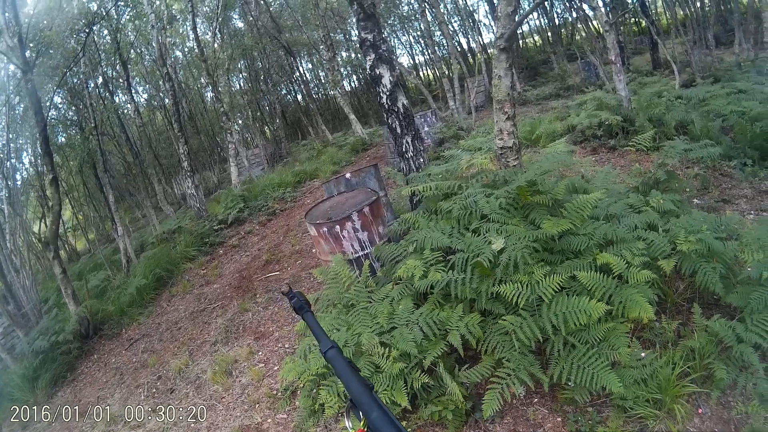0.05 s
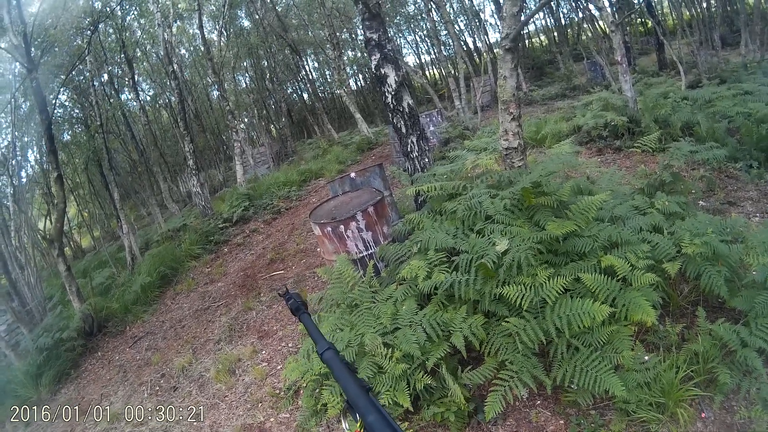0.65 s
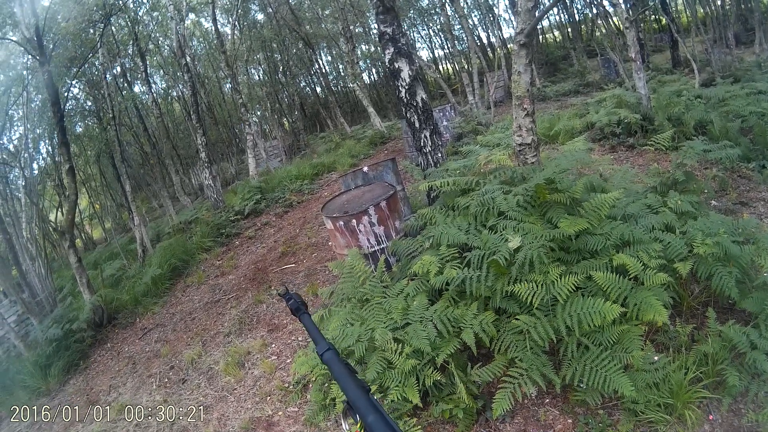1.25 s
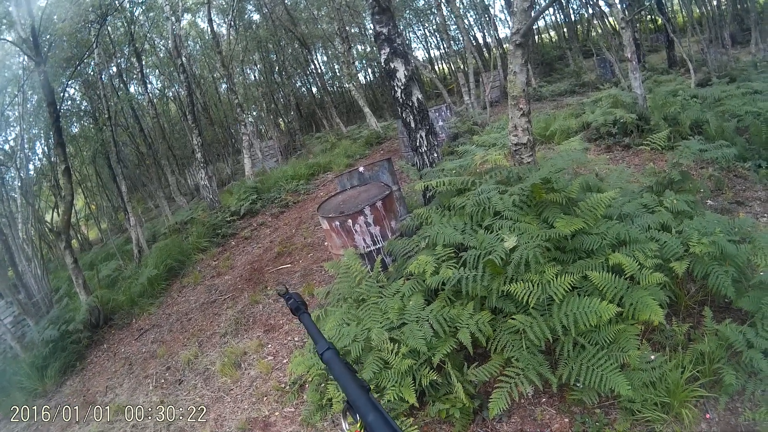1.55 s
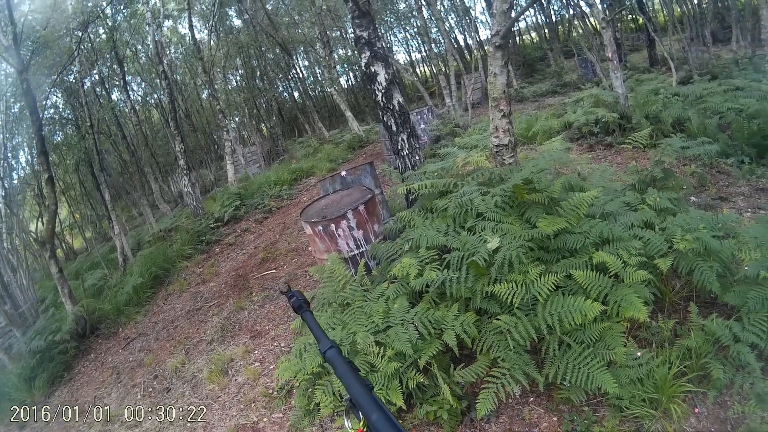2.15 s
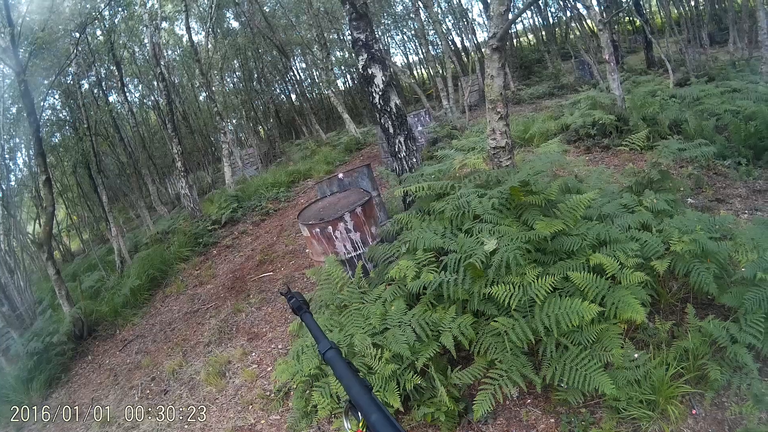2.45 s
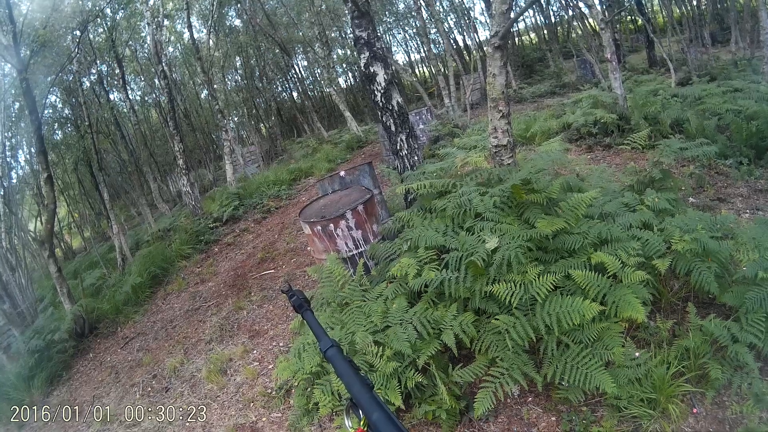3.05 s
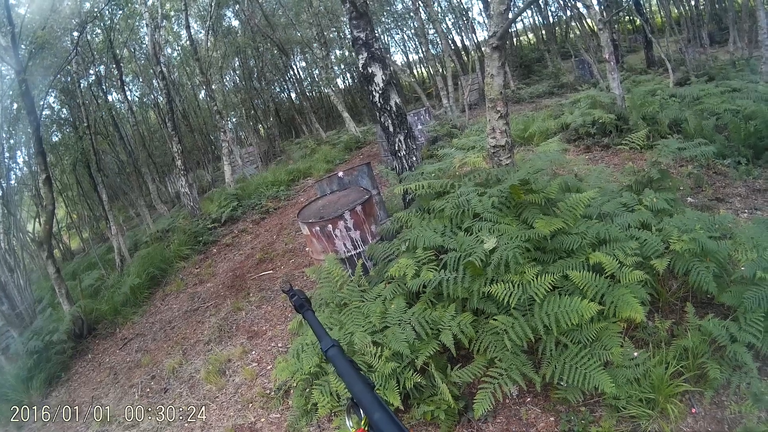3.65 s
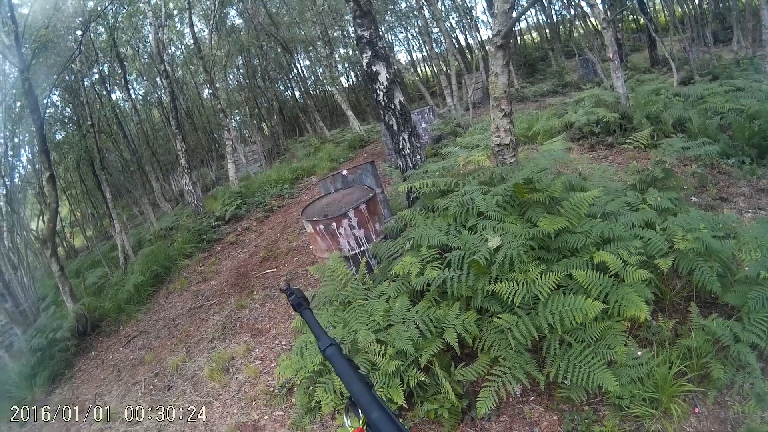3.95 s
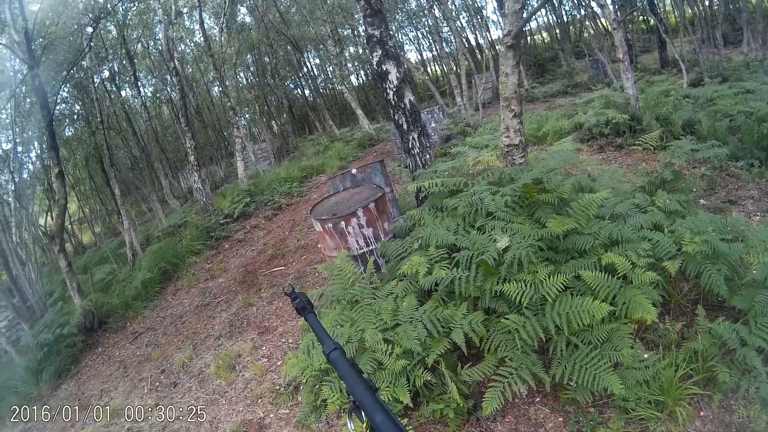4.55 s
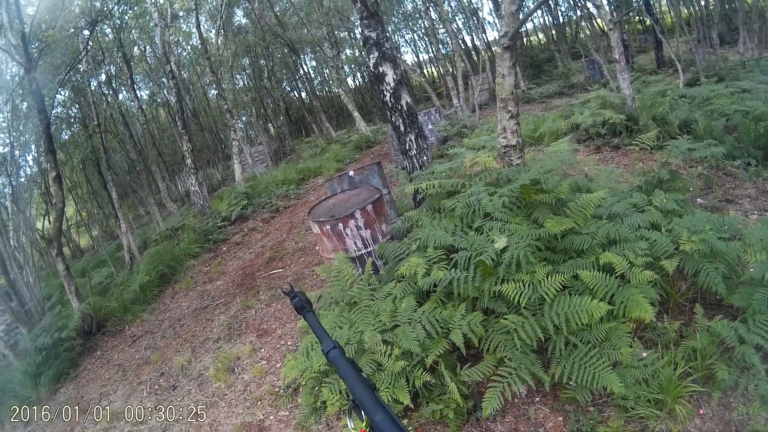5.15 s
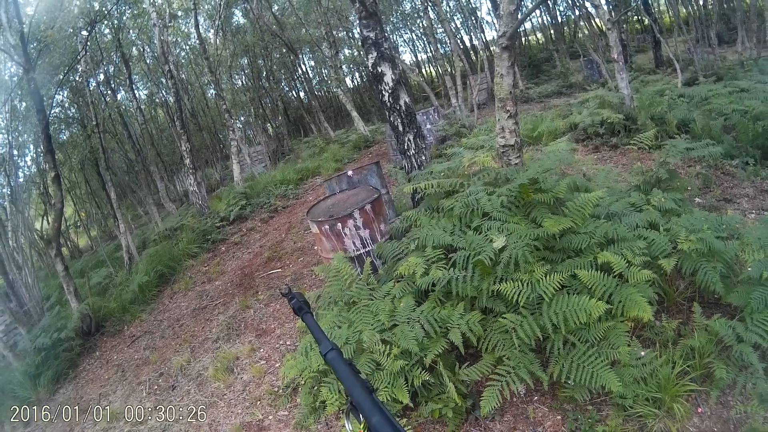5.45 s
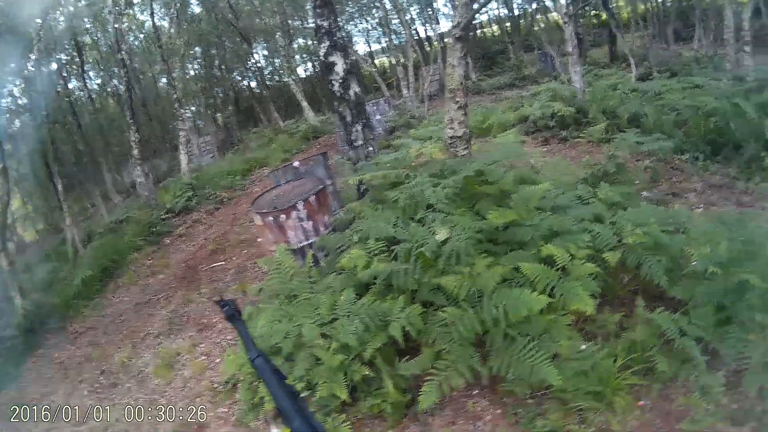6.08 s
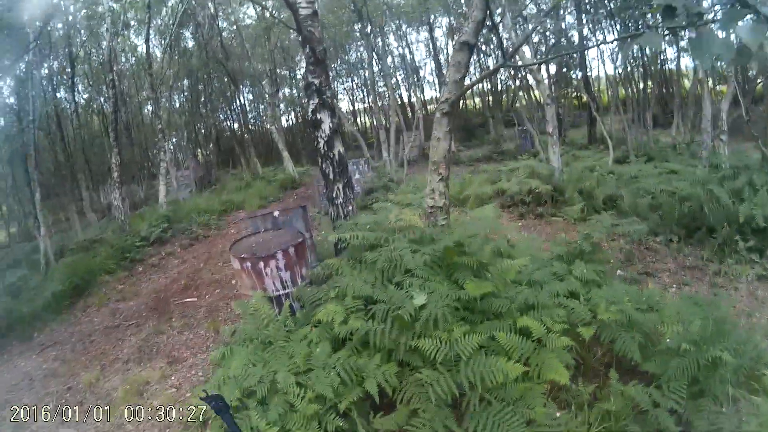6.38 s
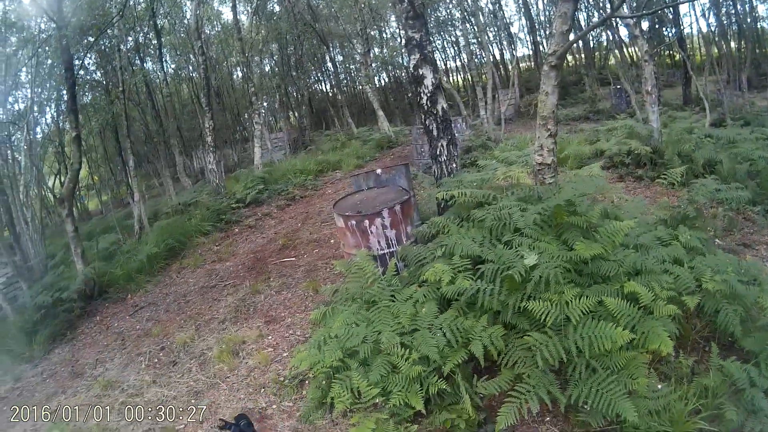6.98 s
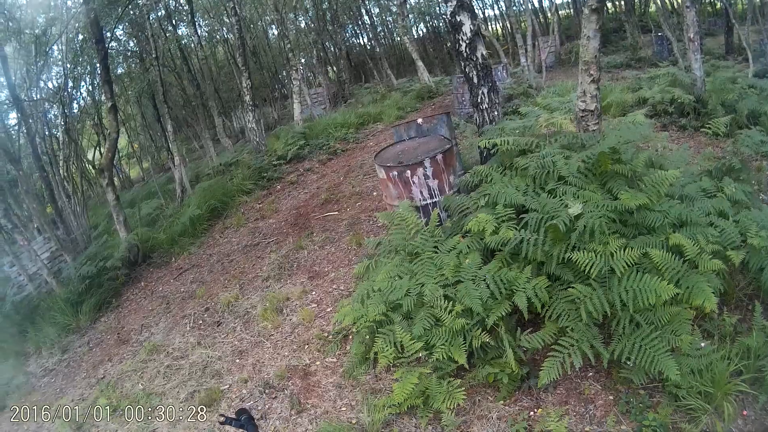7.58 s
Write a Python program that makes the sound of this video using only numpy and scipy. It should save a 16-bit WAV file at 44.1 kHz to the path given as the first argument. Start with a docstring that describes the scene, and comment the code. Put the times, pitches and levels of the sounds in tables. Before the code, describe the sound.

In still woodland, an arm's length from the microphone, an electric airsoft gun rattles through four rapid bursts. Its motor whines and its piston clacks about fourteen times a second, winding down briefly between bursts. Then comes one loud, sharp knock right at the microphone, a few soft handling thumps and a light dry click, leaving only a faint outdoor hiss.

```python
"""In still woodland, an electric airsoft machine gun fires four bursts an arm's length from a head camera.
In each cycle whining gears draw the piston back against its spring and let it go; it rattles forward
and slams home, ringing the barrel and receiver. The trees scatter back a faint tail.
After the last burst a hard knock close to the microphone overloads it, and a lighter click follows.
Soft handling bumps and a quiet bed of air sit underneath."""
import sys
import numpy as np
from scipy import signal
from scipy.fft import rfft, irfft, next_fast_len
from scipy.io import wavfile

SR = 44100
rng = np.random.default_rng(int(sys.argv[2]) if len(sys.argv) > 2 else 0)


def file_out(sig):
    """Save sig as 16-bit WAV at sys.argv[1]."""
    # one column per channel
    cols = np.atleast_2d(sig).T
    # limit, then scale
    lim = np.clip(cols, -1, 1)
    pcm = np.round(lim * 32767).astype(np.int16)
    wavfile.write(sys.argv[1], SR, pcm)


N = 344857
T = np.arange(N) / SR

# Colour of the woodland air. Each row: frequency in Hz, relative level in dB.
AIR_COLOUR = [(20, -6), (50, -16), (100, -13), (200, -14), (400, -18), (800, -26.5), (1300, -30.5),
              (1850, -25.5), (2300, -34), (2850, -31), (4000, -37.5), (8000, -39), (14500, -38.5),
              (16000, -47.5)]
# The camera's thin electronic whistle. Each row: pitch in Hz, rms level in dB.
WHISTLE_TONES = [(6804, -76), (13609, -91)]
# Soft handling thumps. Each row: start in seconds, level in dB, pitch in Hz, t60 in seconds.
HANDLING_BUMPS = [(0.167, -41, 89, 0.075), (5.385, -43, 82, 0.2), (5.946, -29, 160, 0.07),
                  (5.96, -44.5, 81, 0.16), (6.367, -44.5, 44, 0.1), (6.519, -49.5, 85, 0.13),
                  (6.721, -37.5, 132.4, 0.035), (6.766, -44, 73.7, 0.23)]

# Rings of the hollow click, the hard knock, and the barrel and receiver under the slam.
# Each row: pitch in Hz, level in dB before any filtering, t60 in seconds.
CLICK_MODES = [(410, -42, 0.045), (1093, -37.5, .04), (2900, -35, 0.032)]
KNOCK_MODES = [(420, -13.5, .035), (740, -43, .06), (1430, -11.5, 0.045), (1710, 3.5, 0.02),
               (1954, -35.5, 0.076), (2140, 8, .014), (2700, 12.5, 0.01), (2950, 10.5, .01),
               (3960, 5, 0.012), (3950, -32, .12), (5870, -37, 0.056), (6490, -42, .06),
               (7230, -56.5, 0.16)]
BODY_MODES = [(392.2, -28.5, 0.025), (560, -36, 0.035), (683, -39.5, .03), (745, -26, 0.023),
              (964.5, -24, 0.037), (1170, -16, 0.031), (1230, -18.5, 0.043), (1450, -31.5, 0.062),
              (1743, -25, 0.04), (2007, -18, 0.023), (2748, -25, 0.053), (3004, -32, 0.026)]

# Resonances of the latch pawl, the gearbox shell, steel on steel, and the piston's rails.
# Each row: centre in Hz, width in Hz, relative level in dB.
PAWL_PEAKS = [(1030, 250, -6), (1910, 220, 5), (2600, 220, -1), (3140, 220, -3), (3850, 250, -8.5),
              (5840, 970, -17), (8000, 1300, -27.5)]
SHELL_PEAKS = [(540, 85, -5), (741, 23, 7), (832, 41, -2), (925, 65, -3.5), (1100, 110, -6), (1233, 70, 2),
               (1797, 45, -4.5), (1982, 110, 13), (2698, 130, 10), (3147, 230, 7.5), (3773, 170, 3),
               (4743, 280, -6), (5720, 550, -4.5), (7376, 700, -15.5), (8650, 900, -21), (10610, 1100, -13),
               (12200, 900, -18)]
STEEL_PEAKS = [(4050, 450, 2.5), (4643, 300, 8), (5430, 240, 1.5), (6663, 410, -13.5), (10310, 400, -8),
               (11040, 300, -10.5), (12240, 300, -18)]
RAIL_PEAKS = [(895, 270, -7), (1673, 50, -6), (1924, 270, 11), (2570, 52, 3.5), (3052, 59, 13),
              (3880, 330, -6.5)]

# Trigger pulls. Each row: motor on, motor off, gears at rest and first slam, all in seconds,
# number of shots, cycle length in seconds, seconds lost while the motor gains speed.
TRIGGER_PULLS = [(-.2, 1.24, 1.32, .0431, 17, .07216, 0), (1.526, 2.625, 2.71, 1.5665, 15, .07238, .0205),
                 (2.892, 3.95, 4.05, 2.9735, 14, .0725, .012),
                 (4.245, 5.67, 5.785, 4.3031, 20, .07249, .0168)]
# The half-drawn spring throws the gears back on their latch.
# Each row: start in seconds, relative level in dB.
LATCH_CLACKS = [(1.29, -31.5), (2.71, -33), (4.027, -28.5)]
# Gear mesh over one cycle, sagging as the spring is drawn. Each row: position in the cycle from 0 to 1,
# pitch at full speed in Hz, overall gear gain in dB, extra squeal gain in dB.
GEAR_CYCLE = [(0, 2413, 3, -29), (0.2, 2792, -5.5, -16), (0.359, 2761, -3, -13.5), (.54, 2593, -5.5, -9.5),
              (.63, 2500, -5, 2.5), (0.76, 2357, -5, 0), (0.861, 2221, -9, -18), (1, 2381, -8, -24)]

# Steel ticks and rail contacts as the piston runs forward, then rebounds.
# Each row: offset from the slam in seconds, relative level in dB.
RACK_TICKS = [(-.0026, -16.5), (-.0013, -9), (.0025, -20.5), (.0061, -21), (.0071, -24)]
RAIL_CONTACTS = [(-.0054, -5), (-.0039, 1.5), (-.0023, 2.5), (.0018, 0.5), (.0054, -1), (.0069, 0)]


def undb(db):
    """Decibels to gain."""
    return 10 ** (np.asarray(db) / 20)


def unit(x):
    """Scale to rms 1."""
    return x / np.std(x)


def span(seconds):
    """Time axis of a short sound."""
    return np.arange(int(seconds * SR)) / SR


def fade(t, t60):
    """Exponential decay, 60 dB down after t60 seconds."""
    return np.exp(-np.log(1000) * t / t60)


def add(out, at, sound):
    """Mix a sound in at a time in seconds."""
    i = max(int(at * SR), 0)
    out[i:i + len(sound)] += sound[:max(N - i, 0)]


def band(x, low_hz, high_hz):
    """Band-pass EQ."""
    sos = signal.butter(3, [low_hz, min(high_hz, .45 * SR)], "band", fs=SR, output="sos")
    return signal.sosfilt(sos, x)


def through(x, response):
    """Play a sound through an impulse response."""
    return signal.oaconvolve(x, response)[:N]


def strikes(times, sizes):
    """A train of one-sample clicks."""
    return np.bincount(np.clip(np.round(times * SR).astype(int), 0, N - 1), sizes, N)


def scuff(times, sizes, t60):
    """Decaying puffs of friction noise, each gated off after 60 ms."""
    return through(strikes(times, sizes), fade(span(.06), t60)) * rng.standard_normal(N)


def ring(modes, t):
    """Free ring of (Hz, dB, t60) modes."""
    return sum(undb(db) * fade(t, t60) * np.sin(2 * np.pi * hz * t) for hz, db, t60 in modes)


def resonator(peaks, low_hz, high_hz):
    """Unit-energy response of (Hz, width, dB) resonances of a part too small to radiate bass."""
    t = np.arange(2048) / SR
    response = sum(undb(db) * width * np.exp(-np.pi * width * t) * np.sin(2 * np.pi * hz * t)
                   for hz, width, db in peaks)
    response = band(response, low_hz, high_hz)
    return response / np.linalg.norm(response)


def noise(colour, size):
    """Noise of rms 1 with a (Hz, dB) colour."""
    hz, db = np.transpose(colour)
    n = next_fast_len(size, True)
    bin_hz = np.maximum(np.fft.rfftfreq(n, 1 / SR), 1)
    eq = undb(np.interp(np.log(bin_hz), np.log(hz), db))
    return unit(irfft(rfft(rng.standard_normal(n)) * eq, n)[:size])


def walk(rate_hz):
    """A gliding random modulator with a spread near 1."""
    knots = rng.standard_normal(int(N / SR * rate_hz) + 2)
    return np.interp(T * rate_hz, np.arange(len(knots)), knots)


def air(level_db=-61, swell_db=.7):
    """The bed: a quiet rumble and hiss that swells a little."""
    return noise(AIR_COLOUR, N) * undb(level_db + swell_db * walk(6.2))


def woodland(source, wet_db=-28, t60=1.0, build_s=.011):
    """Trunks scatter back a faint tail, scooped in the mids."""
    t = span(.6)
    colour = [(150, 11.5), (500, -2.5), (1200, -9.5), (3000, -12.5), (7000, 4), (15000, -8)]
    tail = noise(colour, len(t)) * fade(t, t60) * (1 - np.exp(-t / build_s))
    return undb(wet_db) * through(source, tail / np.linalg.norm(tail))


def bumps(attack_s=.0016):
    """Soft low thumps as the gun and camera are moved."""
    out, t = np.zeros(N), span(.3)
    for at, db, hz, t60 in HANDLING_BUMPS:
        add(out, at, ring([(hz, db, t60)], t) * (1 - np.exp(-t / attack_s)))
    return out


def click(start_s=6.7643, snap_db=-33, tail_db=-60):
    """A light, dry handling click: a snap, a hollow ring and a faint tail."""
    out, t = np.zeros(N), span(.4)
    colour = [(200, -8), (750, -13), (1100, 1), (1500, -6), (2000, 2),
              (3000, -2.5), (5500, -7), (9000, -12), (14000, -2), (16000, -23)]
    envelope = undb(snap_db) * fade(t, t60=.045) + undb(tail_db) * fade(t, t60=.57)
    add(out, start_s, noise(colour, len(t)) * envelope + ring(CLICK_MODES, t))
    return out


def knock(start_s=5.946, crack_db=1.5):
    """A hard knock right by the microphone: a crack and a short ring."""
    out, t = np.zeros(N), span(.3)
    colour = [(200, -29.5), (1000, -14), (1800, 2), (3200, 1.5), (5000, .5), (9000, -13), (16000, -16)]
    crack = undb(crack_db) * noise(colour, len(t)) * fade(t, t60=.014)
    add(out, start_s, band(crack + ring(KNOCK_MODES, t), low_hz=240, high_hz=14000))
    return out


def recoil(slams, sizes, gain_db=-40):
    """Each shot shakes the camera with a faint low thud."""
    return undb(gain_db) * band(scuff(slams, sizes, t60=.39), low_hz=62, high_hz=200)


def latch(take_up_db=-46, bounce_s=.021, bounce_db=-9):
    """Small steel clacks: the gears take up slack, or fall back on their latch with one bounce."""
    starts = np.array([on for on, *_ in TRIGGER_PULLS if on > 0])
    falls, fall_db = np.transpose(LATCH_CLACKS)
    times = np.r_[starts, falls, falls + bounce_s]
    levels = np.r_[np.full(len(starts), take_up_db), fall_db, fall_db + bounce_db]
    clacks = scuff(times, undb(levels), t60=.052)
    return through(clacks, resonator(PAWL_PEAKS, low_hz=700, high_hz=11040))


def motor_speed(spin_up_s=.041):
    """Speed from 0 to 1: the motor winds up on each trigger pull, then coasts to rest."""
    speed = np.zeros(N)
    for on, off, rest, *_ in TRIGGER_PULLS:
        wind_up = 1 - np.exp(-np.maximum(T - on, 0) / spin_up_s)
        speed += wind_up * np.clip((rest - T) / (rest - off), 0, 1)
    return speed


def cycle_position(slams):
    """A ramp from 0 to 1 from slam to slam, held at 1 in the pauses."""
    period = np.median(np.diff(slams))
    marks = np.r_[slams[0] - period, slams, slams[-1] + period]
    lengths = np.minimum(np.diff(marks), 1.25 * period)
    latest = np.clip(np.searchsorted(marks, T, "right") - 1, 0, len(slams))
    return np.clip((T - marks[latest]) / lengths[latest], 0, 1)


def gears(slams, whine_db=-45, spur_db=-52, squeal_db=-36, grind_db=-31.5, waver_db=.9):
    """The pinion whines and the teeth grind, both ringing the shell; the pitch sags in every cycle."""
    speed, position = motor_speed(), cycle_position(slams)
    points, *curves = np.transpose(GEAR_CYCLE)
    mesh_hz, load_db, strain_db = (np.interp(position, points, curve) for curve in curves)
    wobble = 1 + .018 * walk(900) + .012 * walk(30)
    phase = 2 * np.pi * np.cumsum(mesh_hz * np.sqrt(speed) * wobble) / SR
    whine = undb(whine_db) * np.sin(phase)
    spur = undb(spur_db) * np.sin(phase / 3)
    # with the spring nearly full, the strained teeth squeal on their overtones
    overtones = np.sin(2 * phase) + undb(-10) * np.sin(3 * phase) + undb(-12) * np.sin(4 * phase)
    squeal = undb(squeal_db + strain_db) * overtones
    # the tones drop out first as the gears coast, leaving the rattle
    tones = (whine + spur + squeal) * undb(waver_db * walk(50)) * speed ** 3
    # uneven teeth grind harder once per turn of the pinion
    grit = rng.standard_normal(N) * undb(1.2 * walk(700))
    grind = undb(grind_db) * unit(grit * (1 + .5 * np.sin(phase / 10)))
    drive = (tones + grind) * undb(load_db) * speed ** 1.5
    return through(drive, resonator(SHELL_PEAKS, low_hz=670, high_hz=10170))


def release(slams, sizes, slip_lead_s=.0145, slip_db=-34, spring_lead_s=.014, spring_db=-28.5):
    """Just before each slam the last tooth slips off the piston and the freed spring rasps."""
    slip = scuff(slams - slip_lead_s, sizes, t60=.055)
    rasp = scuff(slams - spring_lead_s, sizes, t60=.05)
    tooth = through(slip, resonator([(1280, 190, 0)], low_hz=700, high_hz=2500))
    spring = through(rasp, resonator([(1960, 170, 0)], low_hz=1300, high_hz=3200))
    return undb(slip_db) * tooth + undb(spring_db) * spring


def steel_rack(slams, sizes, loading_s=.011, loading_db=-36, grit_db=-18, jitter_s=.00008):
    """The bright edge: the piston's rack ticks out and back, then the tappet and nozzle rasp as the next BB
    loads."""
    offsets, tick_db = np.transpose(RACK_TICKS)
    jitter = jitter_s * rng.standard_normal((len(slams), len(offsets)))
    times = (slams[:, None] + offsets + jitter).ravel()
    gains = (sizes[:, None] * undb(tick_db)).ravel()
    ticks = strikes(times, gains) + undb(grit_db) * scuff(times, gains, t60=.0042)
    loading = undb(loading_db) * scuff(slams + loading_s, sizes, t60=.045)
    return through(ticks + loading, resonator(STEEL_PEAKS, low_hz=3490, high_hz=10000))


def piston(slams, sizes, slam_db=.5, rattle_db=-5, scrape_db=-24, jitter_s=.00002, scatter_db=.7):
    """The punch: the piston chatters along its rails, slams into the cylinder head and rebounds."""
    # the rubber piston head softens the blow
    body = band(ring(BODY_MODES, span(.1)), low_hz=499, high_hz=3185)
    slam = through(strikes(slams, sizes * undb(slam_db)), body)
    offsets, contact_db = np.transpose(RAIL_CONTACTS)
    chance = rng.standard_normal((len(slams), 2, len(offsets)))
    times = (slams[:, None] + offsets + jitter_s * chance[:, 0]).ravel()
    gains = (sizes[:, None] * undb(contact_db + scatter_db * chance[:, 1])).ravel()
    contacts = strikes(times, gains) + undb(scrape_db) * scuff(times, gains, t60=.0076)
    rattle = through(contacts, resonator(RAIL_PEAKS, low_hz=1100, high_hz=4050))
    return slam + undb(rattle_db) * rattle


def firing_rhythm(settle=.14, coast_drag=.63, slow_start_db_per_s=-220, scatter_db=.64):
    """Times and strengths of the slams: a steady cycle, slower while the motor gains speed or coasts."""
    times, levels = [], []
    for _, off, _, first, count, cycle, lost in TRIGGER_PULLS:
        shot = np.arange(count)
        at = first + shot * cycle + lost * (1 - settle ** shot)
        times.append(at + coast_drag * np.maximum(at - off, 0))
        levels.append(slow_start_db_per_s * lost * (shot == 0))  # a slow start softens the first shot
    db = np.concatenate(levels)
    return np.concatenate(times), undb(db + scatter_db * rng.standard_normal(len(db)))


def scene():
    """The mono mix: the gun, the knock and the handling among the trees."""
    slams, sizes = firing_rhythm()
    gun = gears(slams) + release(slams, sizes) + piston(slams, sizes)
    gun += steel_rack(slams, sizes) + latch()
    return (gun + woodland(gun) + recoil(slams, sizes) + knock() + click() + bumps() + air())[None]


def record(dry, ceiling=.63, top_hz=15900):
    """The camera adds its whistle, flattens the loudest peaks and cuts the top."""
    whistle = sum(np.sqrt(2) * undb(db) * np.sin(2 * np.pi * hz * T) for hz, db in WHISTLE_TONES)
    overloaded = np.clip(dry + whistle, -ceiling, ceiling)
    return signal.sosfiltfilt(signal.butter(12, top_hz, fs=SR, output="sos"), overloaded)


dry = scene()
out = record(dry)
file_out(out)
```